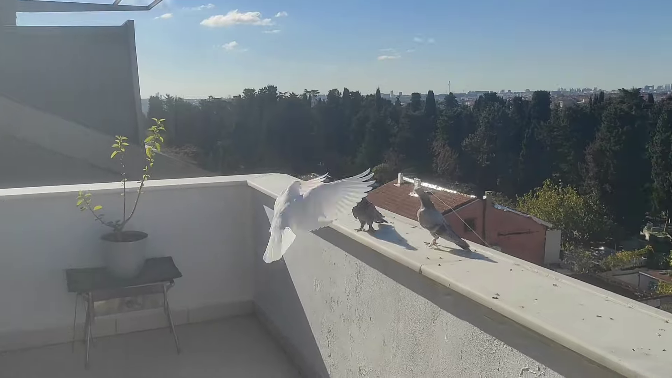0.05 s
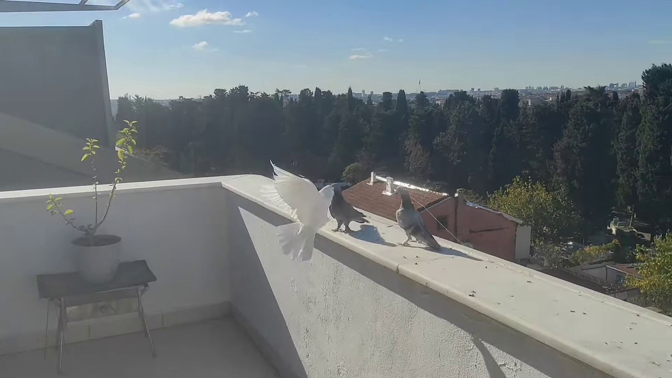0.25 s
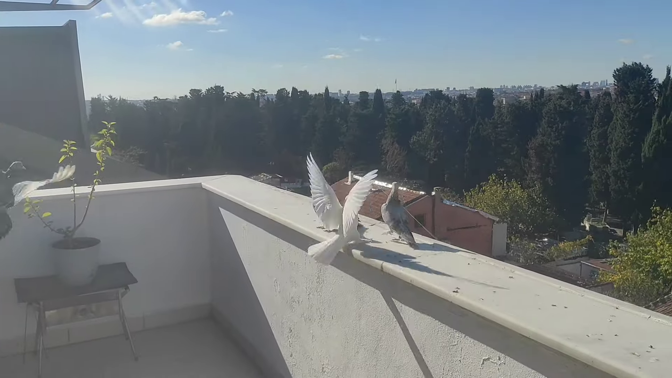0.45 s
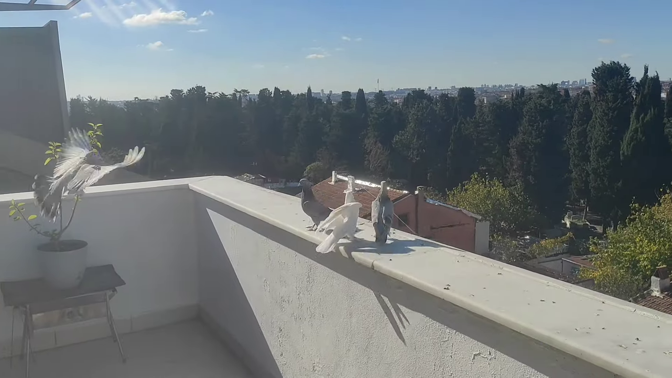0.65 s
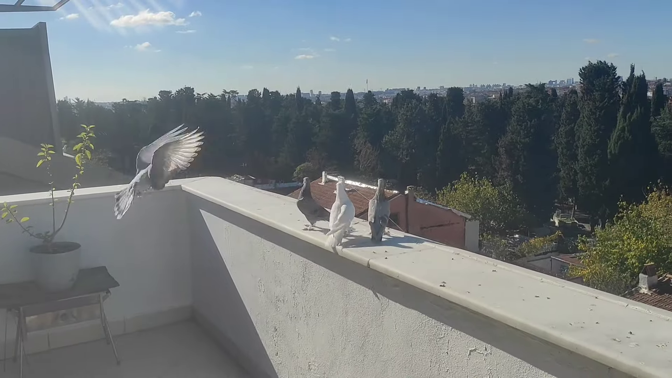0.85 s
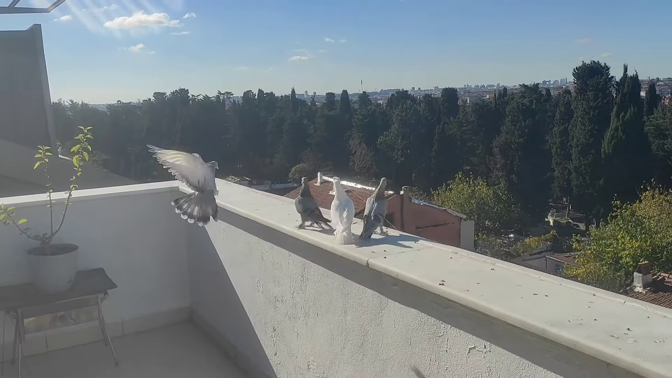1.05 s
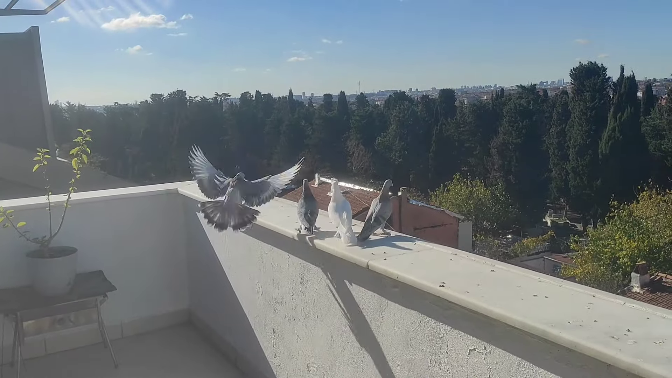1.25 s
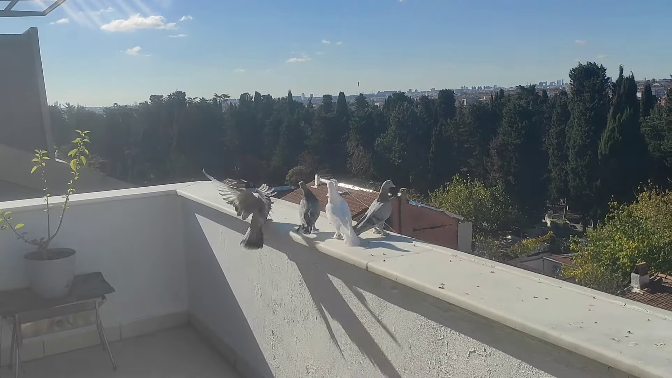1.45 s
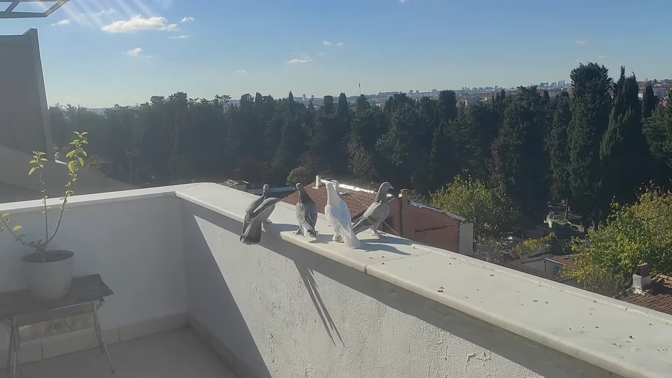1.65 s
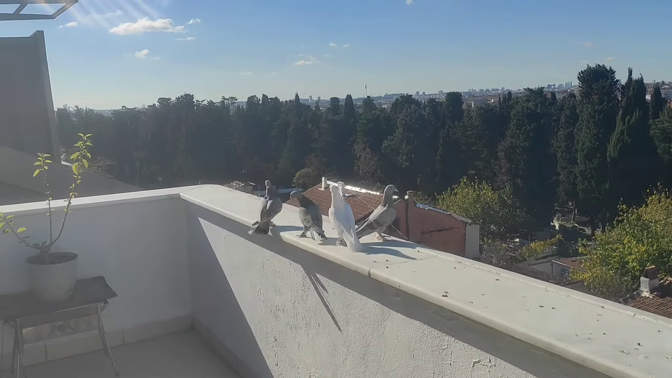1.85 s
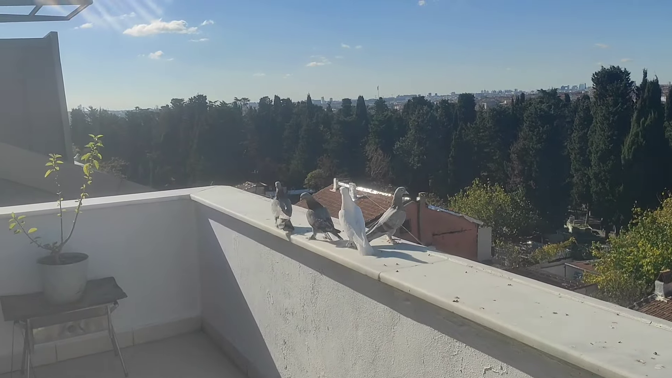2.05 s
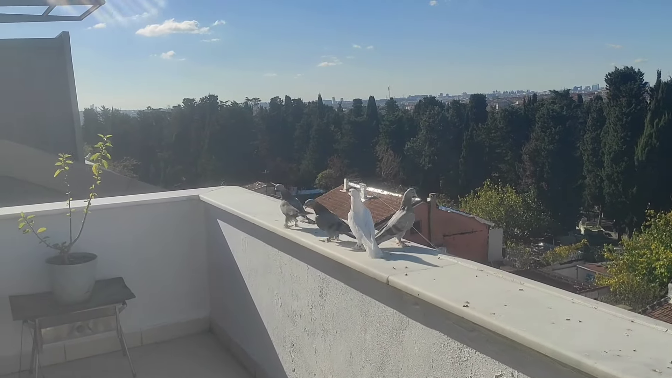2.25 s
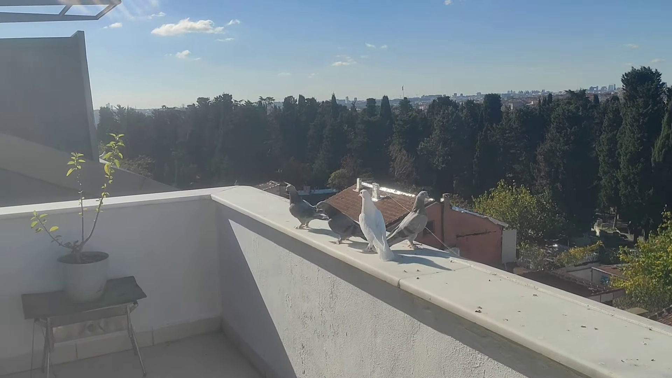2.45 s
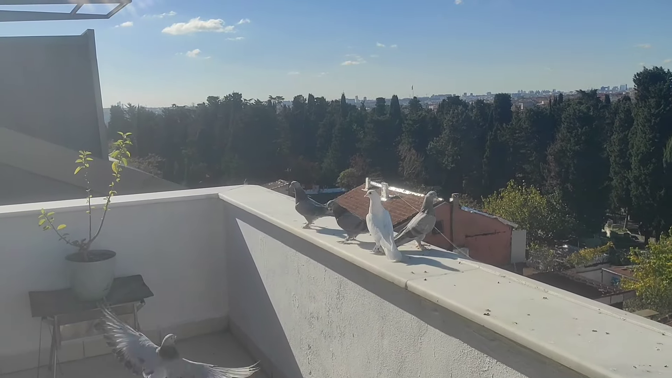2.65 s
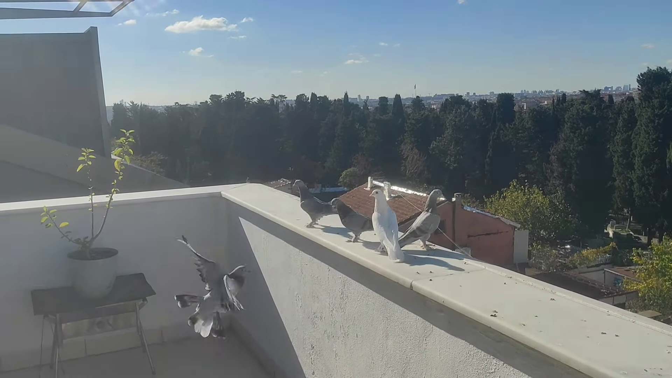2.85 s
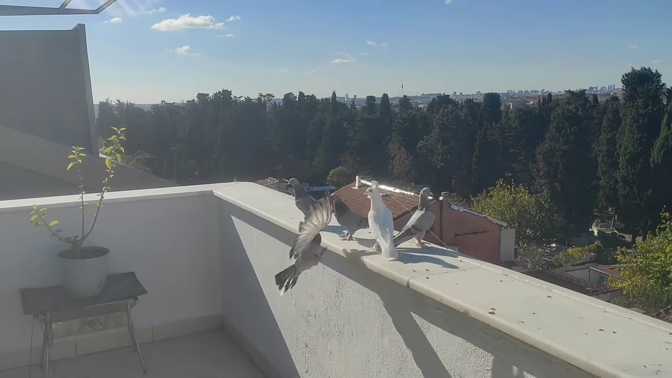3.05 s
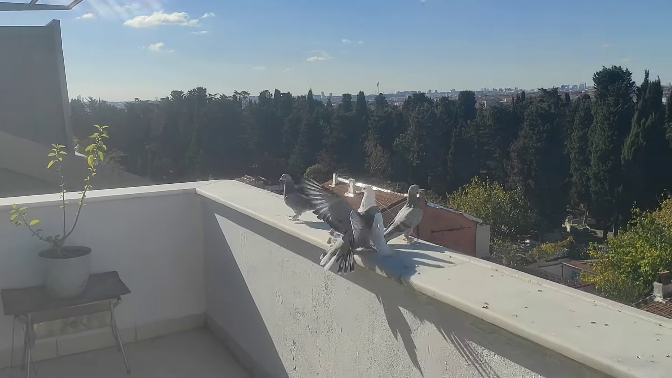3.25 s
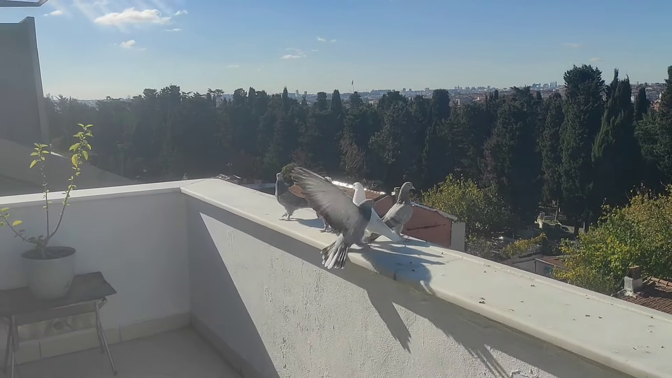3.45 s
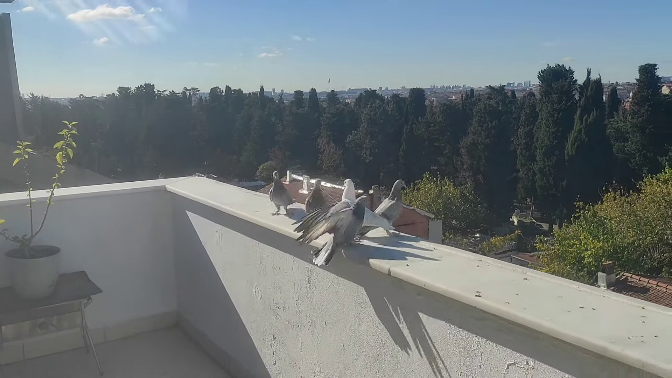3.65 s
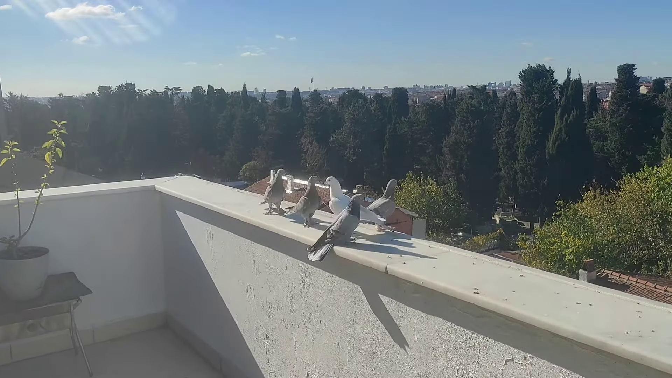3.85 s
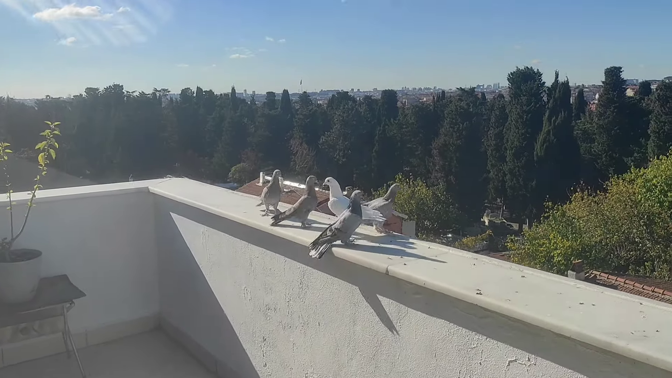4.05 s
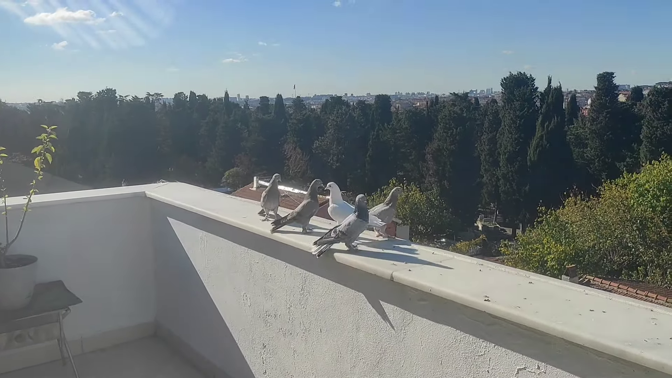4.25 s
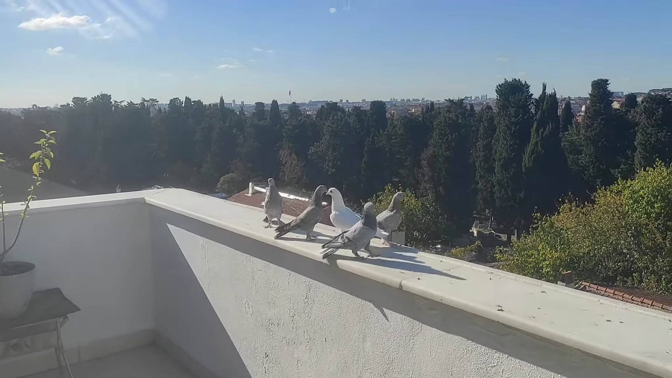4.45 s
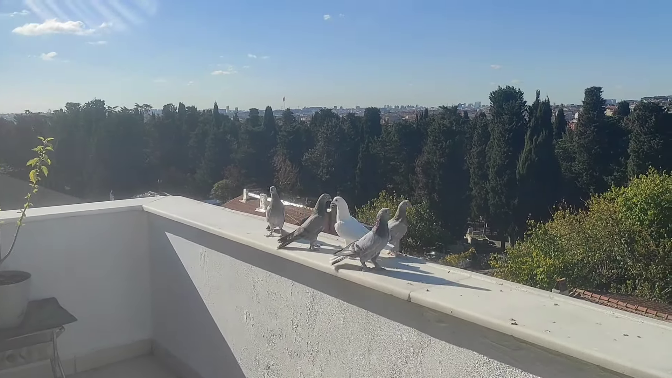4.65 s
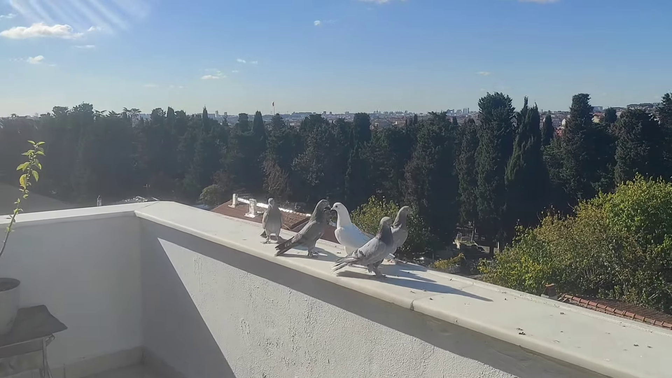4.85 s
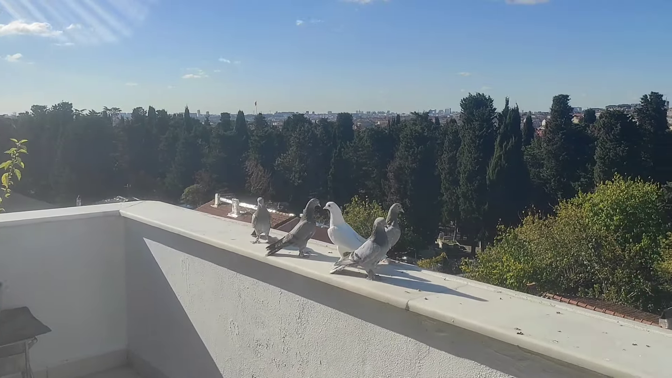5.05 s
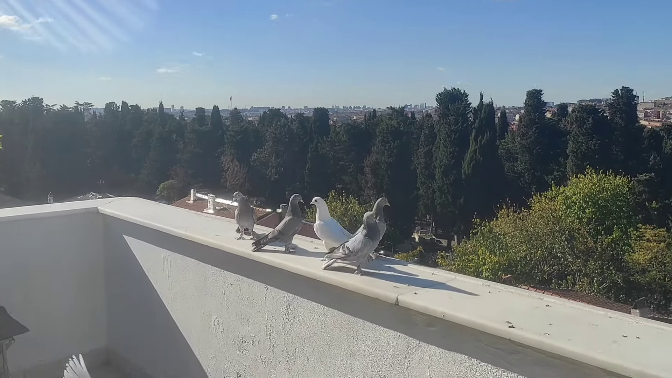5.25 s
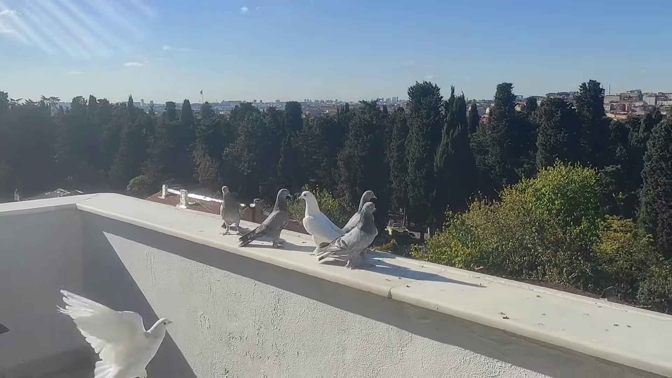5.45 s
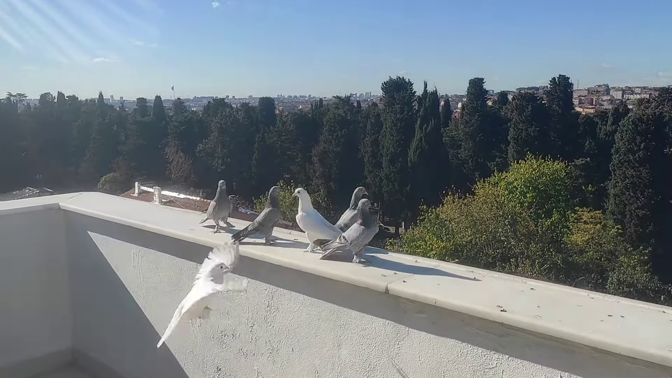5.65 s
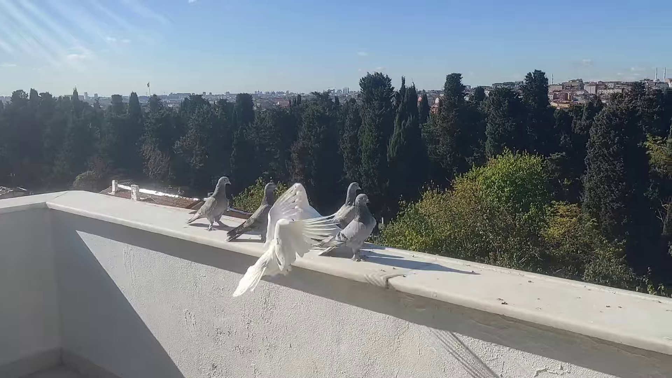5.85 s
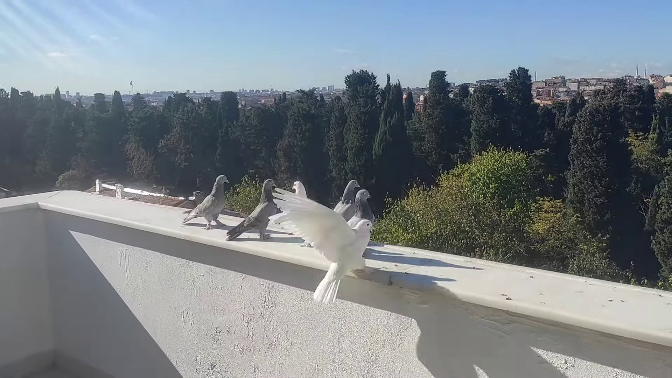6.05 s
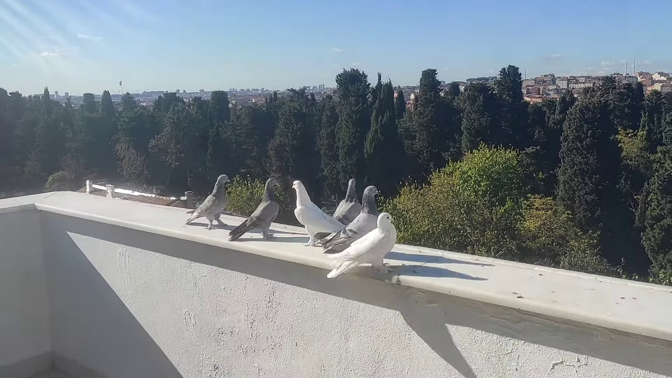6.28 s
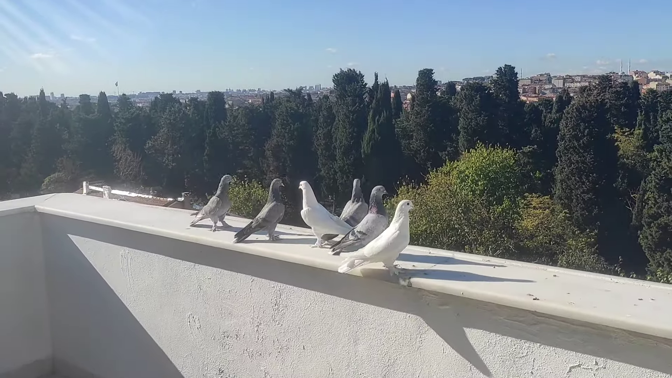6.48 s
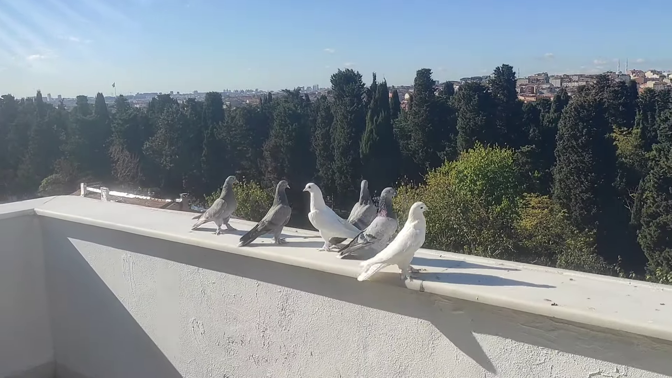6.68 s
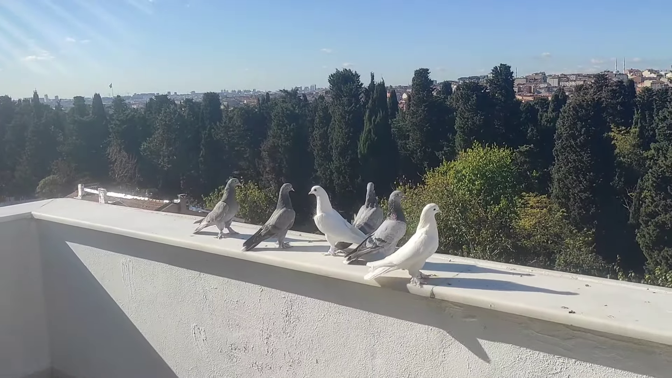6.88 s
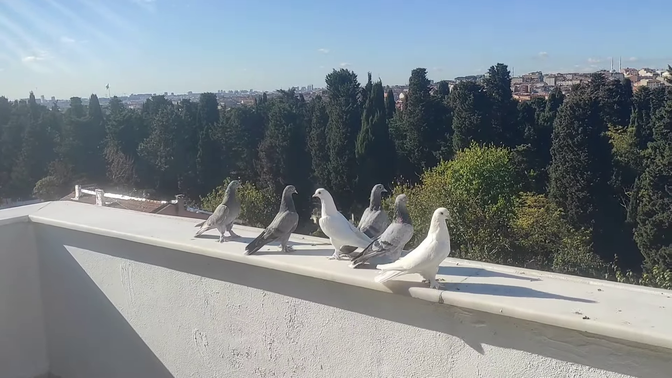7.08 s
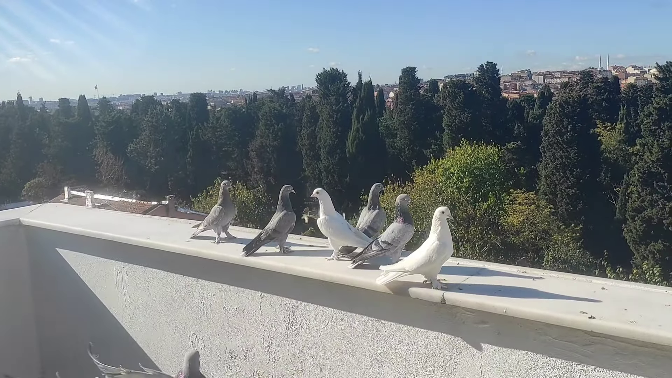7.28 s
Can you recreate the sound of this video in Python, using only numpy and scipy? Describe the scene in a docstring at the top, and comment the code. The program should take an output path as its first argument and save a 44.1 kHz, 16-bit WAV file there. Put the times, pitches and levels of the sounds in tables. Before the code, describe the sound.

Four bursts of pigeon wingbeats, each beat a dry quill snap with a hollow air slap, small thump and feathery swish. The first is gentle, the second brisk, the third strongest after a near-silent pause with light claw ticks on stone, the fourth cut off while still flapping. Feathers rustle between them. Open-air terrace with short wall reflections, low town murmur behind, bright stereo pickup from a small handheld device.

```python
"""Wings clap and swish in four bursts as pigeons fly up to the parapet of a roof terrace; claws tick on it.
A clap is short shaped noise: stiff quills snap, trapped air slaps and thumps, feathers rattle.
Each sweep adds a falling swish, a low rush and a crackling hiss; loose plumage rustles.
The terrace walls answer with decaying noise. Below, a town murmurs with a drone and two humming engines."""
import sys
import numpy as np
from scipy import signal
from scipy.fft import rfft, irfft, next_fast_len
from scipy.io import wavfile
from scipy.ndimage import uniform_filter1d, map_coordinates

SR = 44100
rng = np.random.default_rng(int(sys.argv[2]) if len(sys.argv) > 2 else 0)


def persist_wave(psi):
    """Save psi, clipped to +-1, as 16-bit WAV."""
    counts = np.round(np.clip(psi, -1, 1) * 32767).astype(np.int16)
    wavfile.write(sys.argv[1], SR, np.atleast_2d(counts).T)


N = 322710
SPAN = SR // 3  # samples given to one event

# Wing claps: (time [s], quill snap level [dB], air slap level [dB], thump level [dB],
# pitch of the hollow between the wings [Hz], weight of its ring [ratio],
# contact length [s], left over right for the snap [dB])
WING_CLAPS = [(0.0587, -37, -45.5, -40, 710, 1, 0.0071, -10.5),
              (0.182, -40, -40, -37, 750, 1.46, 0.0115, 6.5),
              (0.3182, -38.5, -44.5, -38.5, 1240, 0.78, 0.0069, -4),
              (0.329, -38.5, -42.5, -42.5, 2020, 1.13, 0.0062, -4.5),
              (0.436, -35, -36.5, -39, 1166, 1.58, 0.0058, -5),
              (0.453, -47, -48, -57, 900, 1.43, 0.0046, -1.5),
              (0.5586, -48, -52, -39.5, 1420, 1.13, 0.0032, -2),
              (0.635, -47.5, -48, -47, 2320, 0.94, 0.006, -6.5),
              (0.8081, -40.5, -48, -44, 720, 1.45, 0.0062, -3.5),
              (0.961, -44, -48.5, -53.5, 750, 0.62, 0.0081, -3),
              (2.32, -33.5, -36, -44, 730, 0.61, 0.0053, -2),
              (2.439, -31, -37, -40, 880, 0.83, 0.0075, -1.5),
              (2.5586, -28.5, -32.5, -33.5, 740, 1.06, 0.0054, 3),
              (2.678, -25, -31, -33.5, 1250, 1.69, 0.0095, -4),
              (2.803, -29, -32.5, -40, 893, 1.1, 0.00845, -4),
              (2.9384, -32, -36.5, -34, 1820, 0.7, 0.0119, -2.5),
              (3.071, -42, -35, -34, 878, 1.93, 0.0075, -4.5),
              (3.1999, -36.5, -41.5, -41.5, 1670, 0.52, 0.0101, -3),
              (3.4992, -45.5, -47.5, -49, 840, 0.59, 0.0077, -1.5),
              (3.621, -49, -55, -43.5, 850, .9, 0.0078, -3),
              (4.914, -43.5, -68, -53.5, 2300, .9, 0.0079, -2.5),
              (5.0315, -25, -29, -34.5, 1700, 0.64, 0.00606, -4.5),
              (5.1484, -20.5, -22.5, -27.5, 1290, 0.53, 0.00466, -5),
              (5.2618, -24, -25, -28, 1346, 1.72, 0.0057, -5),
              (5.3877, -26, -29.5, -38, 2220, 0.58, 0.0081, -7),
              (5.5198, -30.5, -32, -37, 950, 0.23, 0.00683, -4.5),
              (5.6537, -30, -30, -34.5, 1315, 0.67, 0.00713, -10),
              (5.7965, -29.5, -32, -32.5, 1008, 2.39, 0.00915, -8),
              (5.945, -29, -35.5, -33.5, 1186, 1.96, 0.00803, -4.5),
              (6.1024, -38, -36.5, -33.5, 1133, 1.86, 0.00458, -2),
              (6.6956, -32.5, -40, -34.5, 2494, 4.72, 0.0044, -5.5),
              (6.7104, -40, -51, -45.5, 2320, 3.2, 0.0066, -7.5),
              (6.787, -42, -33, -29, 866, 1.02, 0.0127, -2),
              (6.806, -32, -40.5, -36.5, 880, 0.87, 0.00346, -4),
              (6.9268, -35, -35, -37.5, 1280, 0.68, 0.009, -2.5),
              (7.0433, -28, -27.5, -32, 1374, 1.03, 0.00792, -4.5),
              (7.165, -30.5, -26, -39, 2223, 1.07, 0.00474, -4.5),
              (7.2868, -26, -25.5, -32.5, 1717, 0.83, 0.0068, -8)]
# Place of the flapping bird: (time [s], lag of the left port [s])
BIRD_PLACE = [(0.2, .0001), (2.4, .00018), (3.1, .0001), (5.1, .0004), (6.1, .0003), (6.7, -.00005),
              (7.2, 0)]
# Colour of snapping quills: (frequency [Hz], level [dB])
SNAP_SPECTRUM = [(500, -25), (2000, 0), (4000, 1.5), (6000, 0.5), (9000, 2), (12000, -4), (16000, 4.5)]
# Colour of the slap of squeezed air: (frequency [Hz], level [dB])
SLAP_SPECTRUM = [(200, -18.5), (600, 2), (1250, 1), (1800, 1), (2450, -1), (3100, -6.5), (4200, -4),
                 (6000, -13), (12000, -32)]
# Colour of the thump of the wings: (frequency [Hz], level [dB])
THUMP_SPECTRUM = [(40, -6.5), (80, -29), (170, -5), (300, -6.5), (550, -9.5), (1100, -23.5), (4000, -45.5)]
CLOSING_S = 0.00177  # time the wings take to close
# The cupped wings ring at their hollow and, more weakly, CUP_RATIO times above it.
CUP_Q, CUP_RATIO, CUP_UPPER = 5, 1.8, 0.356
# Feathers peel apart after a clap: gain on the slap level, and twice the time to the peak of the swell.
RATTLE_DB, RATTLE_S = -7, 0.0223


def claps():
    """The wings meet: quills strike, squeezed air rings hollow, then the feathers flutter apart."""
    track = np.zeros((2, N))
    (lag,) = curves(BIRD_PLACE)
    t = np.arange(SPAN) / SR
    peeling = t / RATTLE_S * np.exp(1 - t / RATTLE_S * 2)  # peaks at one half
    for s, snap_db, slap_db, thump_db, hollow_hz, hollow, contact, pan_db in WING_CLAPS:
        snap = amp(snap_db) * burst(SNAP_SPECTRUM, rise=CLOSING_S, length=contact, spiky_db=1.0, alike=0.377)
        snap = late_left(snap * amp([[pan_db / 2], [-pan_db / 2]]), lag[round(s * SR)])

        def cup(hz):
            """The air hollow passes the slap and adds two resonances."""
            lower = resonance(hz, hollow_hz, CUP_Q)
            upper = resonance(hz, CUP_RATIO * hollow_hz, CUP_Q)
            return 1 + hollow * (lower + CUP_UPPER * upper)

        slap = burst(SLAP_SPECTRUM, rise=CLOSING_S + 0.00456, length=contact + 0.00094,
                     spiky_db=8.5, alike=0.411)
        slap = filtered(amp(slap_db) * slap, cup) * amp([[1.1], [-1.1]])
        thump = burst(THUMP_SPECTRUM, rise=0.00185, length=0.0278, spiky_db=0.0, alike=0.928)
        thump = amp(thump_db) * thump
        rattle = amp(slap_db + RATTLE_DB) * peeling * crackle(spiky_db=3.5, patchy_db=10.5)
        add(track, s, rattle + terrace(snap + slap, wet_db=-2) + terrace(thump, wet_db=-8.5))
    return track


# Single quills cracking at the wing tips, flicking past each other or brushing the stone:
# (time [s], level [dB], length [s])
QUILL_FLICKS = [(0.0032, -40, 0.00067), (0.182, -42, 0.00069), (0.1873, -40, 0.00095),
                (0.1892, -36.5, 0.00093), (1.261, -53.5, 0.015), (1.392, -48.5, 0.036),
                (2.331, -37, 0.0047), (2.449, -38.5, 0.0047), (2.5616, -25.5, 0.0012),
                (2.566, -34, 0.00066), (2.635, -40, 0.0065), (2.6775, -30.5, 0.00101),
                (2.804, -28.5, 0.0014), (3.0723, -24, 0.00111), (3.0765, -27.5, 0.00106),
                (3.124, -39, 0.0058), (3.25, -47.5, 0.0048), (3.749, -56, 0.0137), (5.1682, -35, 0.00058),
                (5.2648, -21.5, 0.00083), (5.267, -24.5, 0.00046), (5.2846, -42, 0.0011),
                (5.3965, -32, 0.00054), (5.6522, -37, 0.00054), (6.1028, -36, 0.00117),
                (6.654, -52.5, 0.0026), (6.967, -42.5, 0.007), (7.264, -48, 0.0063)]
QUILL_PAN_DB = -3.5  # left over right


def quills():
    """Single stiff quills crack together, flick past each other or brush the stone."""
    track = np.zeros((2, N))
    (lag,) = curves(BIRD_PLACE)
    for s, db, length in QUILL_FLICKS:
        flick = burst(SNAP_SPECTRUM, rise=length / 3, length=length, spiky_db=-0.5, alike=0.293)
        flick = amp(db) * flick * amp([[QUILL_PAN_DB / 2], [-QUILL_PAN_DB / 2]])
        flick = late_left(flick, lag[round(s * SR)])
        add(track, s, terrace(flick, wet_db=-3.5))
    return track


# Wing sweeps: (time of the fastest point [s], swish level [dB], centre of the swish [Hz],
# length of the swell to each side [s], feather hiss level [dB])
WING_SWEEPS = [(0.115, -48, 736, 0.0193, -52), (0.261, -51, 680, 0.028, -62.5),
               (0.388, -55, 741.3, 0.082, -53), (0.533, -54, 724.6, 0.031, -75),
               (0.728, -49.5, 752.2, 0.02, -59.5), (0.886, -49, 787.6, 0.0226, -62.5),
               (1.033, -49, 787.3, 0.021, -60), (1.17, -51, 774, 0.029, -66),
               (1.328, -50.5, 770, 0.0393, -56), (1.469, -52, 767.4, 0.037, -58),
               (2.369, -37, 749.4, 0.0173, -49.5), (2.427, -43.5, 420, 0.0158, -66),
               (2.492, -39.5, 883.3, 0.0128, -49), (2.503, -42, 421.3, 0.023, -65),
               (2.614, -37, 877.7, 0.0096, -45), (2.745, -42.5, 791, 0.0177, -51),
               (2.862, -47.5, 799, 0.0138, -52), (2.998, -40.5, 765, 0.0118, -48),
               (3.121, -41.5, 770.2, 0.0115, -44), (3.266, -54, 741, 0.0207, -57.5),
               (4.965, -43.5, 940, 0.0103, -53), (5.026, -41.5, 901.7, 0.0123, -64.5),
               (5.096, -43, 898.5, 0.0134, -63.5), (5.214, -40, 897.7, 0.0092, -58),
               (5.338, -47, 909, 0.015, -48), (5.444, -60, 836, 0.0144, -66),
               (6.755, -43.5, 338.1, 0.0276, -54.5), (6.845, -41.5, 697, 0.0143, -48.5),
               (6.91, -37, 766, 0.0126, -41.5), (6.972, -40.5, 694, 0.0104, -40),
               (7.023, -42, 776, 0.016, -45), (7.099, -41.5, 758.7, 0.0141, -47),
               (7.153, -45, 781, 0.0129, -40.5), (7.218, -40.5, 780.7, 0.0081, -57.5),
               (7.273, -40.5, 725, 0.0138, -44.5)]
# Colour of the low rush of a sweep: (frequency [Hz], level [dB])
RUSH_SPECTRUM = [(60, -9), (160, -13), (260, -4.5), (450, -9.5), (900, -21), (3000, -41)]
MIDDLE_S = .09  # a sweep peaks this long after the start of its span
OVERTONE, OVERTONE_DB = 2.05, -11  # pitch ratio and level of a weaker band from the thin outer feathers
RUSH_DB = -8  # level of the rush relative to the swish


def strokes():
    """Each sweep of the wing sheds two bands of eddies, a low rush and a crackling hiss."""
    track = np.zeros((2, N))
    t = np.arange(SPAN) / SR

    def swell(width):
        """The sound grows and fades evenly around the fastest point."""
        return np.exp(-((t - MIDDLE_S) / width) ** 2)

    for s, swish_db, centre_hz, length, hiss_db in WING_SWEEPS:
        bands = eddies(centre_hz) + amp(OVERTONE_DB) * eddies(OVERTONE * centre_hz)
        swish = swell(length) * bands
        rush = amp(RUSH_DB) * swell(0.054) * unit(coloured(pair(SPAN, 1.0), RUSH_SPECTRUM))
        hiss = amp(hiss_db) * swell(1.595 * length) * crackle(spiky_db=-1, patchy_db=2)
        add(track, s - MIDDLE_S, terrace(amp(swish_db) * (swish + rush) + hiss, wet_db=-5))
    return track


EDDY_WIDTH_HZ = 148  # from the centre of the band to half gain
EDDY_SAG_PER_S = 5  # the pitch falls as the wing slows (share of the pitch per s)


def eddies(centre_hz):
    """Air eddies make a narrow band of noise that glides down through centre_hz, at rms 1."""
    hz = centre_hz * np.exp(-EDDY_SAG_PER_S * (np.arange(SPAN) / SR - MIDDLE_S))
    noise = np.array([pair(SPAN, 0.774), pair(SPAN, 0.54)])
    a, b = filtered(noise, lambda f: 1 / (1 + (f / EDDY_WIDTH_HZ) ** 2))
    phase = 2 * np.pi * np.cumsum(hz) / SR  # slow noise rides on a gliding tone
    return unit(a * np.cos(phase) + b * np.sin(phase))


# Colour of hissing feathers: (frequency [Hz], level [dB])
HISS_SPECTRUM = [(400, 4), (1300, 14), (3000, 8.5), (6000, 1), (9000, -3), (11000, -13.5), (16000, 0.5)]


def crackle(spiky_db, patchy_db):
    """Vanes catch and slip: feather hiss at rms 1 in uneven grains of changing colour."""
    grains = flutter() * amp(spiky_db * np.tanh(.7 * wobble(420, SPAN)))
    z = signal.stft(pair(SPAN, 0.203) * grains, nperseg=256)[2]
    # smooth random patches over pitch and time
    field = uniform_filter1d(rng.standard_normal(z.shape[1:]), size=4, axis=0)
    field = uniform_filter1d(field, size=4, axis=1)
    patchy = signal.istft(z * amp(patchy_db * unit(field)), nperseg=256)[1][:, :SPAN]
    return unit(coloured(patchy, HISS_SPECTRUM))


# Feathers slip free: typical rate, fading time of a slip, spread of sizes, steady share
SLIPS_PER_S, SLIP_S, SLIP_SPREAD_DB, FLUTTER_BED = 100, .0028, 7, .18


def flutter(count=200):
    """Envelope of feathers slipping free one after another, at uneven intervals and strengths."""
    gaps, sizes = rng.standard_normal((2, count))
    starts = np.append(0, np.cumsum(np.exp(.5 * gaps)) / SLIPS_PER_S)
    t = np.arange(SPAN) / SR
    last = np.searchsorted(starts, t, side="right") - 1  # the latest slip at each moment
    strength = amp(SLIP_SPREAD_DB * np.tanh(sizes[last]))
    return FLUTTER_BED + strength * np.exp(-(t - starts[last]) / SLIP_S)


# Ruffled plumage: (time of the peak [s], level [dB])
PLUMAGE_RUFFLES = [(0.0, -49), (0.736, -59.5), (2.366, -48), (4.965, -47), (6.785, -50)]
# Birds fold their wings and jostle on the ledge: (time [s], rustle level [dB], length to each side [s])
LEDGE_SCUFFLES = [(1.513, -58.5, 0.047), (3.555, -64, 0.306), (4.334, -61, 0.047), (6.7, -49, 0.037)]
# Claws ticking and scraping on the ledge: (time [s], level [dB], length [s])
CLAW_TICKS = [(4.03, -53.5, 0.00047), (4.0329, -55.5, 0.00155), (4.57, -46.5, 0.0224)]
# Colour of a claw on stone: (frequency [Hz], level [dB])
TICK_SPECTRUM = [(400, -14), (2000, -1), (5000, -2), (7000, 2), (12000, -4), (16000, 4)]
# Plumage starts to stir this long before its peak, then settles towards a resting level.
RUFFLE_S, SETTLE_DB_PER_S, RESTING_DB = 0.107, 12.5, -64


def ledge():
    """Claws tick on stone; plumage rubs as a hiss that swells in ruffles and scuffles and settles."""
    t = np.arange(N) / SR
    power = amp(RESTING_DB) ** 2
    for start, plumage_db in PLUMAGE_RUFFLES:
        stir = np.clip(1 + (t - start) / RUFFLE_S, 0, 1)
        power = power + (stir * amp(plumage_db - SETTLE_DB_PER_S * np.abs(t - start))) ** 2
    for s, db, length in LEDGE_SCUFFLES:
        power = power + (amp(db) * np.exp(-((t - s) / length) ** 2)) ** 2
    unrest_db = 1.3 * wobble(25, N) + 1.8 * wobble(300, N)
    track = np.sqrt(power) * amp(unrest_db) * unit(coloured(pair(N, 0.0155), HISS_SPECTRUM))
    for s, db, length in CLAW_TICKS:
        tick = amp(db) * burst(TICK_SPECTRUM, rise=length / 2, length=length, spiky_db=16.5, alike=0.86)
        add(track, s, terrace(tick, wet_db=-8))
    return track


# How fast the terrace echo dies: (frequency [Hz], time to fall by 60 dB [s])
TERRACE_DECAY = [(200, 0.224), (1500, 0.2317), (8000, 0.165), (15000, 0.1377)]


def terrace(x, wet_db, gap=0.00137):
    """Floor and walls answer x with a decaying noise tail, newly drawn for each sound."""
    hz, t, z = signal.stft(rng.standard_normal((2, SPAN)), SR, nperseg=256)
    fading = amp(-60 * t / along(TERRACE_DECAY, hz)[:, None])
    tail = signal.istft(z * fading, SR, nperseg=256)[1][:, :SPAN]
    t = np.arange(SPAN) / SR
    # the tail starts after a brief gap, uneven at first and then smoother
    uneven_db = 3.9 * np.exp(-t / 0.0074) * np.tanh(wobble(910, SPAN))
    tail *= (1 - np.exp(-(t / gap) ** 2)) * amp(uneven_db)
    tail /= np.linalg.norm(tail, axis=1, keepdims=True)
    return x + amp(wet_db) * signal.fftconvolve(x, tail, axes=1)[:, :SPAN]


# Colour of distant traffic: (frequency [Hz], level [dB])
TRAFFIC_SPECTRUM = [(15, 0), (30, 5), (42, 2), (80, -7), (125, -5.5), (165, 2), (270, 0), (450, -4),
                    (700, -5.5), (1000, -6), (2000, -14), (3200, -26.5), (6000, -33.5), (12000, -59.5)]
# How alike the traffic is left and right: (frequency [Hz], likeness [0 to 1])
TRAFFIC_ALIKE = [(100, 0.83), (300, 1), (700, 1), (1500, 0.511), (6000, 0.025)]
# A low drone of the town: (time [s], level [dB])
DRONE_LEVEL = [(0, -53.5), (1.4, -56.5), (2.7, -57), (3.9, -48.5), (4.7, -56), (7.3, -51)]
# A far engine easing off: (time [s], firing rate [Hz], hum at twice that rate [dB], higher overtones [dB])
ENGINE_COURSE = [(0, 54.51, -58.5, -60.5), (1.5, 53.91, -57, -58), (2.5, 53.42, -56, -52),
                 (3.0, 51.6, -61, -59.5), (3.3, 49.91, -71.5, -64.5), (7.3, 49.23, -67, -63)]
# Higher overtones of that engine: (multiple of the firing rate, level [dB])
EXHAUST_OVERTONES = [(3, -2), (4, 3), (5, -2), (7, -7.5), (8, -1)]
# A second far motor revs up and drops back: (time [s], firing rate [Hz], level [dB])
MOTOR_COURSE = [(5.0, 53.58, -57.5), (5.6, 63.06, -55), (6.3, 80.3, -57.5), (6.6, 76.88, -51),
                (7.0, 60.2, -59.5), (7.3, 55.5, -62)]
TRAFFIC_DB, DRONE_HZ = -47, 56.86  # typical level and pitch; both waver


def town():
    """Distant traffic as wide noise, a wavering low drone, and two engines humming through it."""
    t = np.arange(N) / SR

    def turn(hz):
        """Angle that shares the noise between middle and sides."""
        return np.arccos(np.clip(along(TRAFFIC_ALIKE, hz), -1, 1)) / 2

    def murmur(hz):
        """Traffic colour for the middle and the sides."""
        return amp(along(TRAFFIC_SPECTRUM, hz)) * [np.cos(turn(hz)), np.sin(turn(hz))]

    mid, side = filtered(rng.standard_normal((2, N)), murmur)
    traffic = amp(TRAFFIC_DB + 0.63 * wobble(4.39, N)) * unit(np.array([mid + side, mid - side]))
    drone_gain = amp(curves(DRONE_LEVEL)[0] + 1.87 * wobble(5.6, N))
    drone_hz = DRONE_HZ * (1 + 0.02315 * wobble(7.0, N))
    drone = drone_gain * np.sin(2 * np.pi * np.cumsum(drone_hz) / SR)

    engine_hz, hum_db, overtones_db = curves(ENGINE_COURSE)
    engine = amp(hum_db) * hum(engine_hz, [(2, 3.34)])
    engine = engine + amp(overtones_db) * hum(engine_hz, EXHAUST_OVERTONES)
    motor_hz, motor_db = curves(MOTOR_COURSE)
    arrived = np.clip(t - MOTOR_COURSE[0][0] + 1, 0, 1)  # fades in over the second before its first row
    motor = arrived * amp(motor_db) * hum(motor_hz, [(1, 1.0), (2, -2.16)])
    return late_left(traffic + drone + engine + motor, lag=-0.0003888) * amp([[.5], [-.5]])


def hum(firing_hz, orders):
    """Multiples of an engine's firing rate, each fading on its own in the moving air."""
    phase = 2 * np.pi * np.cumsum(firing_hz * (1 + 0.002 * wobble(6, N))) / SR
    return sum(amp(db + 1.5 * wobble(4, N)) * np.sin(round(k) * phase) for k, db in orders)


def burst(spectrum, rise, length, spiky_db, alike):
    """A brief contact as coloured noise with uneven snaps, with the energy of 5 ms at rms 1."""
    t = np.arange(SPAN) / SR
    shape = (1 - np.exp(-(t / rise) ** 2)) * np.exp(-(t / length) ** 2)
    snaps = amp(spiky_db * np.tanh(wobble(1284, SPAN)))
    x = coloured(pair(SPAN, alike) * shape * snaps, spectrum)
    return x / np.linalg.norm(x, axis=1, keepdims=True) * np.sqrt(.005 * SR)


def resonance(hz, centre_hz, q):
    """Response of one resonance, about 1 at its centre."""
    return 1 / (1 + 1j * q * (hz / centre_hz - centre_hz / (hz + 1)))


def late_left(x, lag):
    """The sound reaches the left port lag seconds after the right."""
    return filtered(x, lambda hz: np.exp(1j * np.pi * hz * lag * np.array([[-1], [1]])))


def pair(size, alike):
    """White noise in two channels that share a part."""
    share = np.clip(alike, 0, 1)
    common = np.sqrt(share) * rng.standard_normal(size)
    return common + np.sqrt(1 - share) * rng.standard_normal((2, size))


def coloured(x, spectrum):
    """x through a causal (minimum-phase) filter with the given spectrum."""
    def response(hz):
        cepstrum = irfft(np.log(amp(along(spectrum, hz))))
        # folding the cepstrum forward puts the response after time zero
        cepstrum[1:len(hz) - 1] *= 2
        cepstrum[len(hz):] = 0
        return np.exp(rfft(cepstrum))
    return filtered(x, response)


def filtered(x, response):
    """x times a complex response of frequency."""
    size = x.shape[-1]
    m = 2 * next_fast_len(size // 2 + 2048)  # room for the ringing
    return irfft(rfft(x, m) * response(np.fft.rfftfreq(m, 1 / SR)), m)[..., :size]


def wobble(rate, size):
    """A smooth random curve, rate knots a second."""
    knots = rng.standard_normal(int(size * rate / SR) + 4)
    return map_coordinates(knots, [np.arange(size) * rate / SR])


def curves(rows):
    """One value per sample for each column after the time."""
    s, *cols = np.transpose(rows)
    return [np.interp(np.arange(N) / SR, s, c) for c in cols]


def along(points, hz):
    """Values at hz, read between (frequency, value) points on a log axis."""
    f, v = np.transpose(points)
    return np.interp(np.log(hz + 1), np.log(f), v)


def amp(db):
    """Decibels to gain."""
    return 10 ** (np.asarray(db) / 20)


def unit(x):
    """x at rms 1."""
    return x / np.sqrt(np.mean(x ** 2) + 1e-20)


def add(track, s, sound):
    """Mix a sound into the track at time s, cut off at the ends of the track."""
    start = round(s * SR)
    part = sound[:, max(-start, 0):max(N - start, 0)]
    track[:, max(start, 0):][:, :part.shape[1]] += part


def scene():
    """The birds over the sound of the town."""
    return claps() + quills() + strokes() + ledge() + town()


# Microphone ports, left then right: (ringing pitch [Hz], width of the ring [Hz], level of the port [dB])
MICROPHONE_PORTS = [(8403, 933, 0), (7435, 717, -2.0)]
TOP_HZ = 15300  # steep upper limit of the band


def record(dry):
    """Each port is a small cavity that rings and rolls off above its pitch; peaks round off, then the top is cut."""
    heard = []
    for x, (ring_hz, width_hz, db) in zip(dry, MICROPHONE_PORTS):
        rung = filtered(x, lambda hz: ring_hz ** 2 / (ring_hz ** 2 - hz ** 2 + 1j * hz * width_hz))
        heard.append(amp(db) * rung)
    heard = np.array(heard)
    heard = heard / (1 + (heard / .92) ** 6) ** (1 / 6)  # soft ceiling at 0.92
    return filtered(heard, lambda hz: 1 / np.sqrt(1 + (hz / TOP_HZ) ** 140))


dry = scene()
out = record(dry)
persist_wave(out)
```